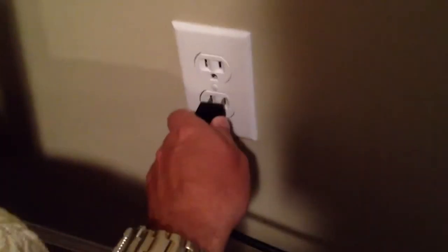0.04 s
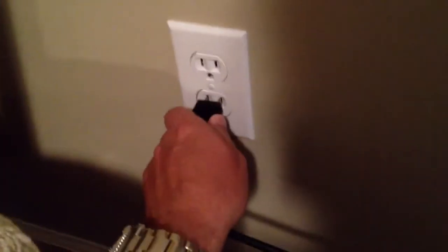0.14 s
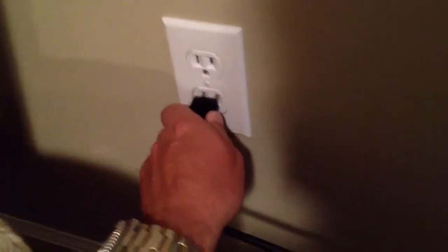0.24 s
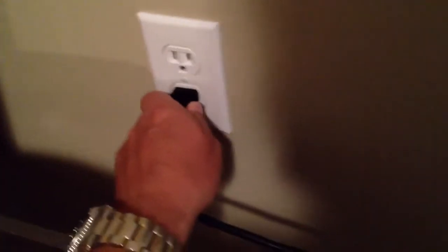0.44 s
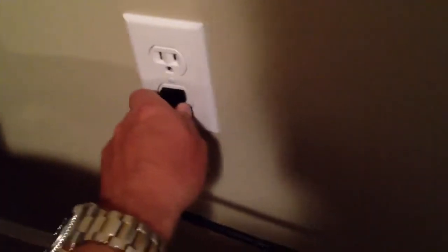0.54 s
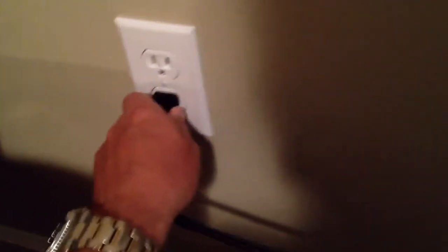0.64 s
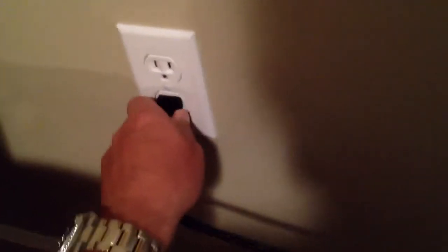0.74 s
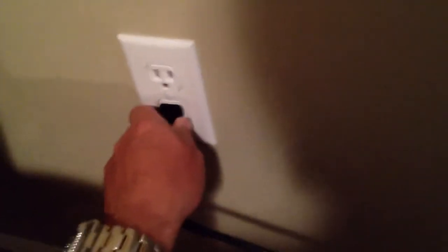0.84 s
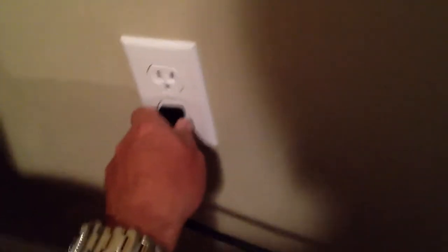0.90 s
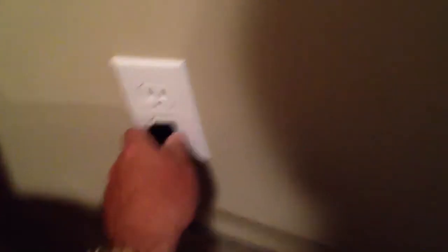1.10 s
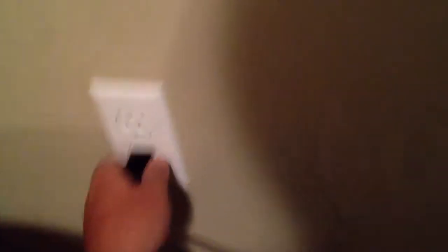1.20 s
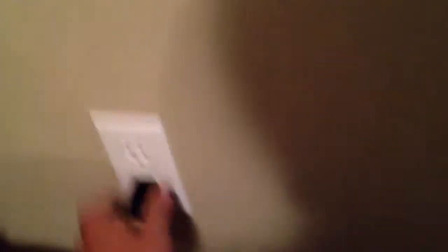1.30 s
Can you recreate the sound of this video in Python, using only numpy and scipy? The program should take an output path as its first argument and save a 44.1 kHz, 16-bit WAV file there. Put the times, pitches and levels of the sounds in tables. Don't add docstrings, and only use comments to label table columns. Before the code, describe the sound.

Plug pushed into a wall socket: metallic ticks, a sharp snap, a plastic clack, then faint rattling

```python
import sys
import numpy as np
from scipy import signal
from scipy.fft import rfft, irfft
from scipy.io import wavfile
from scipy.ndimage import map_coordinates

SR = 44100
rng = np.random.default_rng(int(sys.argv[2]) if len(sys.argv) > 2 else 0)


def log_audio(samples):
    frames = np.atleast_2d(samples).T
    limited = np.clip(frames, -1, 1)
    pcm = np.round(limited * 32767).astype(np.int16)
    wavfile.write(sys.argv[1], SR, pcm)


def how_loud(loudness_db):
    steps = np.asarray(loudness_db, float) / 20
    return 10 ** steps


N = 59535


def colour(x, table):
    hz = np.fft.rfftfreq(len(x), 1 / SR) + 1
    table_hz, table_db = np.transpose(table)
    gain = how_loud(np.interp(np.log(hz), np.log(table_hz), table_db))
    cepstrum = irfft(np.log(gain), len(x))
    cepstrum = cepstrum * (np.arange(len(x)) < len(x) // 2) * 2
    y = irfft(rfft(x) * np.exp(rfft(cepstrum)), len(x))
    return y / y.std()


def walk(rate):
    steps = rng.standard_normal(200)
    where = np.arange(N) * min(rate, 100) / SR + 2
    w = map_coordinates(steps, [where], order=3)
    return w / w.std()


def ring(x, modes):
    t = np.arange(8000) / SR
    body = np.zeros(len(t))
    for k, (hz, db, t60) in enumerate(modes):
        body += (-1) ** k * how_loud(db) * np.sin(2 * np.pi * hz * t) * 1000. ** (-t / t60)
    return signal.fftconvolve(x, body)[:len(x)]


def struck(x, modes, dbs):
    return ring(x, [(hz, db, t60) for (hz, t60), db in zip(modes, dbs)])


def add(track, s, piece):
    i = int(s * SR)
    track[i:i + len(piece)] += piece[:N - i]


def high(x, hz):
    return signal.sosfilt(signal.butter(3, hz, "high", fs=SR, output="sos"), x)


def chatter(length_s, rise_s):
    t = np.arange(3000) / SR
    x, size = rng.standard_normal((2, 3000))
    swell = np.minimum(t / rise_s, 1) ** 2
    fade = np.exp(-np.maximum(t - rise_s, 0) / length_s * 2)
    shape = how_loud(2.5 * size) * swell * fade
    for _ in range(2):
        spectrum = rfft(np.sign(x) * shape)
        x = irfft(spectrum / np.abs(spectrum))
    x = x * np.clip(shape / shape.std() * 2, 0, 1)
    return x / np.sqrt(np.sum(x ** 2))


# multiple of the base note, level in dB.
HUM_TONES = [(1, -80.5), (2, -72.5), (3, -72.5), (4, -68), (5, -86), (6, -81.5), (7, -73.5), (10, -98),
             (11, -82.5), (14, -79), (18, -78.5)]


def hum():
    base_hz = 59.26 * (1 + 0.00912 * walk(15.42))
    phase = 2 * np.pi * np.cumsum(base_hz) / SR
    out = np.zeros(N)
    for multiple, db in HUM_TONES:
        level = np.sqrt(2) * how_loud(db + 4.5 * walk(20))
        out += level * np.sin(round(multiple) * phase + 6 * rng.random())
    return out


# pitch in Hz, level in dB per Hz.
AIR_COLOUR = [(30, -29), (85, -29), (125, 0), (230, -9), (1000, -18), (1300, -23), (9500, -33),
              (15000, -32)]


def air():
    x = colour(rng.standard_normal(N), AIR_COLOUR)
    rumble = signal.sosfilt(signal.butter(2, 1100, fs=SR, output="sos"), x)
    hiss = x - rumble
    flicker_db = 1.5 * walk(25.2)
    return how_loud(-59.5) * (hiss + rumble * how_loud(flicker_db))


# time in seconds, level in dB.
SCRAPE_LEVEL = [(0, -70), (.06, -66.5), (.075, -66.5), (0.138, -53), (.19, -64), (.214, -62.5),
                (0.228, -38), (.3, -59), (.4, -67), (.6, -77), (1.0, -95), (1.05, -71), (1.12, -65),
                (1.2, -74), (1.278, -67.5), (1.3, -58.5), (1.35, -59)]
# pitch in Hz, level in dB.
SCRAPE_TONE = [(200, -27.5), (600, 2), (1200, 0), (2500, 4.5), (5000, -0.5), (8000, -2.5), (10000, -10.5),
               (15000, -3)]


def scrape():
    noise = rng.standard_normal(N)
    grit_db = 1.6 * rng.exponential(size=N)
    grit = colour(noise * how_loud(grit_db), SCRAPE_TONE)
    times, levels = np.transpose(SCRAPE_LEVEL)
    patchy_db = 1.5 * walk(43.56)
    return grit * how_loud(np.interp(np.arange(N) / SR, times, levels) + patchy_db)


# middle of the band in Hz, time to fade by 60 dB in seconds, level in dB.
ROOM_BANDS = [(248, 0.28, 7.5), (430, 0.32, -2), (1020, 0.33, -12.5), (2000, 0.34, -9), (4000, 0.4, -10.5),
              (7650, 0.27, -10), (14400, 0.29, -15)]


def room(x):
    gap_s = 0.0017
    t = np.arange(16000) / SR
    tail = np.zeros(len(t))
    for hz, t60, db in ROOM_BANDS:
        band = signal.butter(2, [hz * 0.72, min(hz * 1.32, 20000)], "band", fs=SR, output="sos")
        noise = signal.sosfilt(band, rng.standard_normal(len(t)))
        tail += how_loud(db) * noise * 1000. ** (-t / t60)
    return signal.fftconvolve(x, 0.033 * tail * np.clip(t / gap_s, 0, 1) ** 2)[:N]


# start in seconds, level in dB, pitch in Hz,
# time to fade by 60 dB in seconds.
WALL_THUDS = [(.002, -50.5, 234.5, 0.088), (0.1019, -43.5, 165.4, 0.092), (0.106, -54, 168, 0.064),
              (.115, -52.5, 233, 0.085), (0.1189, -53, 523, 0.048), (0.2221, -39, 213, 0.056),
              (0.237, -53, 247, 0.11), (0.4557, -46, 172, 0.061), (0.4607, -37.5, 175.8, 0.039),
              (0.467, -31.5, 178, 0.045), (0.526, -67, 190, .06), (0.618, -57, 231.4, 0.2),
              (0.701, -55, 132, 0.14), (0.796, -51.5, 127, 0.072), (0.927, -61.5, 184.3, 0.32),
              (0.994, -51, 133, 0.065), (1.198, -48, 182, 0.063), (1.217, -49, 223, 0.034),
              (1.261, -42.5, 193, 0.072), (1.284, -46.5, 162.4, 0.13), (1.307, -48, 207, 0.11)]


def thuds():
    out = np.zeros(N)
    for s, db, hz, t60 in WALL_THUDS:
        push = np.hanning(int(0.69 / hz * SR))
        push = np.pad(push / push.sum(), (0, 6000))
        panel = ring(push, [(hz, 0, t60), (1.6 * hz, -6, 0.71 * t60)])
        add(out, s, how_loud(db) * 2 * panel)
    return out


# pitch in Hz, time to fade by 60 dB in seconds.
PLATE_TONES = [(420, .015), (640, .012), (850, .012), (1020, .012), (1180, .014), (1280, .02), (2124, .014)]
PLATE_LEVELS = [-24, -17, -9, -12, 3, -11, -9]


def ring_plate(x):
    return struck(x, PLATE_TONES, PLATE_LEVELS)


# start in seconds, level in dB, chatter length in seconds.
PLATE_NUDGES = [
    (0.065, -47.5, 0.0051),
    (0.134, -41, 0.0039),
    (0.949, -53, 0.0053),
    (1.3013, -49, 0.0016),
]


def nudges():
    out = np.zeros(N)
    for s, db, length in PLATE_NUDGES:
        add(out, s, how_loud(db) * 0.84 * ring_plate(chatter(length, 0.00099)))
    return out


# pitch in Hz, time to fade by 60 dB in seconds.
PRONG_TONES = [(2590, .04), (3483, .012), (4600, .009), (7200, .005), (9889, .008), (10600, .005),
               (12000, .003), (14300, .003)]
PRONG_LEVELS = [-3, -8, -1, -12, -14, -8, 4, -4]


def ring_prongs(x):
    return struck(x, PRONG_TONES, PRONG_LEVELS)


def metal_touches(events, rise_s):
    out = np.zeros(N)
    for s, db, length, low_hz, high_hz in events:
        x = chatter(length, rise_s)
        band = signal.butter(2, [low_hz, min(high_hz, 16000)], "band", fs=SR, output="sos")
        add(out, s, how_loud(db) * signal.sosfilt(band, 6 * x + how_loud(-18.5) * ring_prongs(x)))
    return out


# start in seconds, level in dB, chatter length in seconds,
# lowest pitch in Hz, highest pitch in Hz.
PRONG_TICKS = [
    (.0657, -40, 0.00033, 4000, 15000),
    (.0663, -34.5, 0.0031, 4000, 14200),
    (.067, -37, 0.0059, 990, 3480),
    (.129, -53, 0.0025, 4000, 15000),
    (0.1365, -49, 0.0027, 4000, 15000),
    (0.214, -45, 0.0087, 2000, 15000),
    (.4617, -30, 0.0022, 9500, 14900),
]


def ticks():
    return metal_touches(PRONG_TICKS, .0003)


# start in seconds, level in dB, chatter length in seconds,
# lowest pitch in Hz, highest pitch in Hz.
PRONG_GRAZES = [(.0745, -38.5, 0.0038, 4000, 8300), (.091, -36, 0.0045, 4640, 5150),
                (.133, -35, 0.0033, 4550, 5140), (1.2885, -46, 0.0098, 11000, 15000),
                (1.2885, -44, .008, 4000, 6500), (1.298, -39.5, 0.015, 11100, 15100),
                (1.3005, -38, 0.0046, 4470, 6700), (1.303, -36, 0.0055, 2370, 2920),
                (1.31, -43, .005, 2350, 2900), (1.306, -36.5, 0.0039, 4160, 5240),
                (1.314, -45, 0.0045, 4450, 5100), (1.332, -39, 0.007, 4000, 8000),
                (1.342, -33, 0.0087, 3500, 5500)]


def grazes():
    return metal_touches(PRONG_GRAZES, .0025)


# start in seconds, level in dB,
# chatter length in seconds, plate ring in dB.
PRONG_SNAPS = [
    (.2198, -17, .0003, 7),
    (.2209, -23, .0005, -6),
    (.2219, -25, .0003, -12),
    (.2224, -27, .0015, -8),
    (.2241, -30, .0005, -4),
    (.2245, -30, .005, -8),
    (.229, -30, .003, -2),
    (.2325, -32, .005, -6),
    (.238, -33, .008, -8),
    (.2425, -32, .008, -8),
]
# pitch in Hz, level in dB.
SNAP_TONE = [(500, -19), (1200, -3), (1700, 0), (4600, 0), (5500, -5.5), (7000, -3.5), (12000, 0.5),
             (15000, 0)]


def snaps():
    out = np.zeros(N)
    for s, db, length, plate_db in PRONG_SNAPS:
        x = chatter(length, length * .5)
        crack = 0.052 * how_loud(6) * colour(x, SNAP_TONE)
        prongs = 0.2 * ring_prongs(x)
        plate = 0.25 * how_loud(plate_db) * ring_plate(x)
        add(out, s, how_loud(db) * (crack + prongs + plate))
    return out


# pitch in Hz, level in dB.
CLACK_TONE = [(300, -13.5), (700, -0.5), (1050, 6.5), (1600, 0), (3000, -3.5), (5000, -7.5), (9000, -14),
              (15000, -18)]
# pitch in Hz, time to fade by 60 dB in seconds.
BODY_TONES = [(380, .02), (527, .03), (700, .015), (935, .024), (1021, .02), (1307, .02), (1500, .012),
              (1930, .011), (2120, .014), (2310, .012), (2622, .014), (3004, .02), (3350, .013),
              (3750, .008)]


def body_hits(events, dbs):
    out = np.zeros((2, N))
    low = np.array(BODY_TONES)[:, 0] < 1400
    for s, db, length, low_db, crack_db in events:
        x = chatter(length, length * .5)
        add(out[0], s, how_loud(db + crack_db) * 0.071 * colour(x, CLACK_TONE))
        add(out[1], s, how_loud(db) * 0.38 * struck(x, BODY_TONES, dbs + low_db * low))
    return out


# start in seconds, level in dB, chatter length in seconds,
# low tones in dB, crack in dB.
PLUG_CLACKS = [(.4222, -33.5, 0.0021, -18, 11), (.4234, -19, 0.00083, -13, -6.5),
               (.4245, -19.5, .0008, -9, -1.5), (.4255, -22, 0.001, 6.5, 1.5),
               (.4264, -21, 0.0018, 3.5, 2.5), (.4284, -25.5, 0.00075, -2, 3.5),
               (.4308, -26, 0.0019, -18, 5), (.433, -39, 0.0076, -14, 13.5), (.4368, -37.5, 0.0019, 11, 5),
               (.4398, -28, 0.004, 7, -5), (.442, -31, 0.011, 0, 12), (.452, -37, 0.027, 2, 12.5)]
CLACK_LEVELS = [-13, -22, -35, 0.5, 2.5, -16, -20, -0.5, 2, 7.5, 6, 4, 3, 3.5]


def clacks():
    return body_hits(PLUG_CLACKS, CLACK_LEVELS)


# start in seconds, level in dB, chatter length in seconds,
# low tones in dB, crack in dB.
PLUG_KNOCKS = [
    (1.3045, -52.5, 0.0025, 7, -8),
    (1.311, -56, 0.0019, -1, 9),
    (1.323, -66, .003, -9, -8),
    (1.3325, -41, 0.0018, 2, -2),
    (1.3347, -41, 0.00044, 2.5, -1),
    (1.3368, -42, 0.00046, 6.5, 5),
    (1.339, -38, 0.00042, 0, -11),
    (1.341, -38.5, 0.00048, -0.5, -13),
    (1.3435, -41.5, 0.0012, 2, 1),
    (1.3462, -37.5, 0.0031, -7, -10),
]
KNOCK_LEVELS = [0, -0.5, -3.5, -8, -1, -2.5, -2.5, 7, 3, 8, 7.5, 2.5, -3, 3.5]


def knocks():
    return body_hits(PLUG_KNOCKS, KNOCK_LEVELS)


def scene():
    hand_low_hz, bass_cut_hz = 250, 104
    metal = high(ticks() + grazes() + snaps() + nudges() + scrape(), hand_low_hz)
    crack, body = high(clacks() + knocks(), hand_low_hz)
    tail = room(metal + how_loud(3.5) * crack + how_loud(-8.5) * body)
    wall = high(thuds(), bass_cut_hz)
    return (metal + crack + body + tail + wall + hum() + air())[None]


def band_limit(x):
    return signal.sosfilt(signal.butter(12, 16550, fs=SR, output="sos"), x)


def record(dry):
    top_cut = signal.ellip(10, .5, 36, 15200, fs=SR, output="sos")
    mix = signal.sosfilt(top_cut, dry)
    return band_limit(mix)


dry = scene()
out = record(dry)
log_audio(out)
```